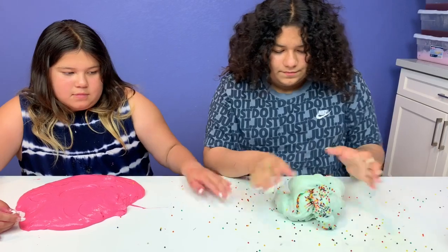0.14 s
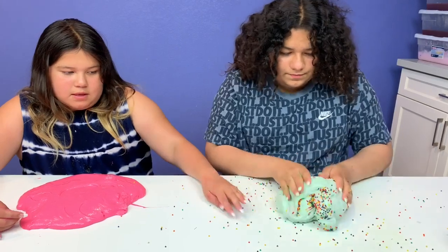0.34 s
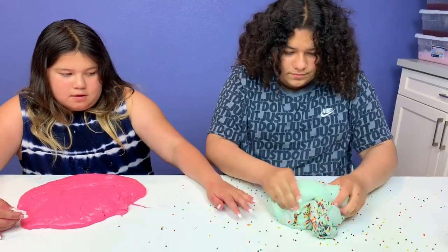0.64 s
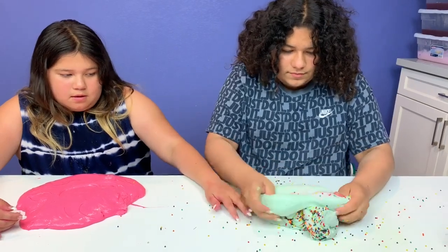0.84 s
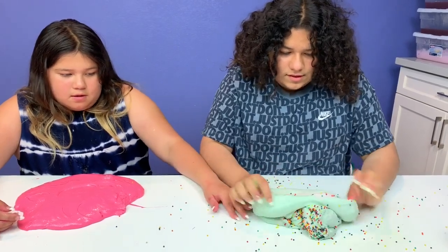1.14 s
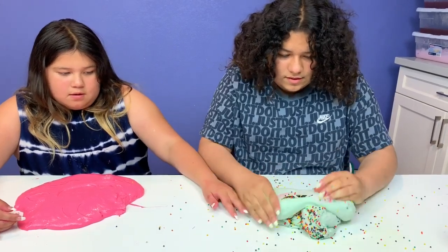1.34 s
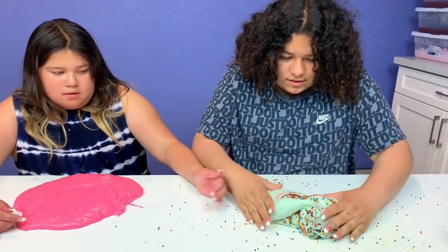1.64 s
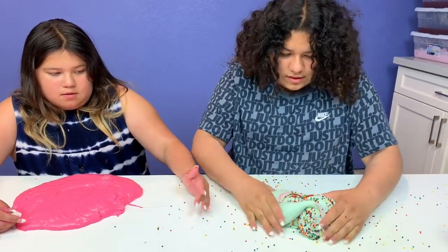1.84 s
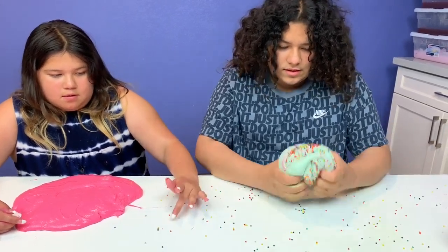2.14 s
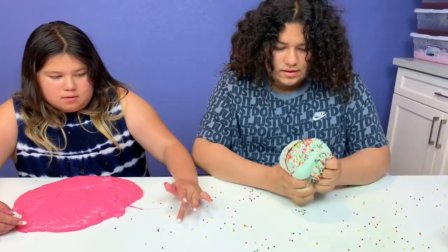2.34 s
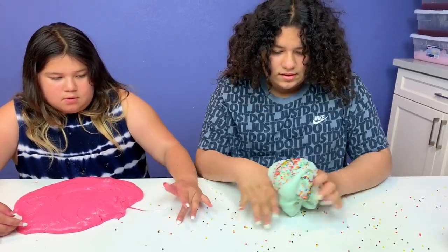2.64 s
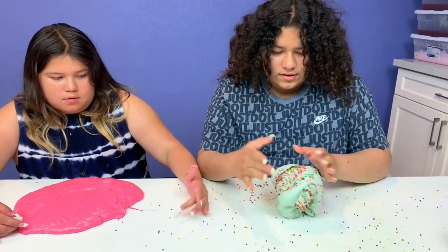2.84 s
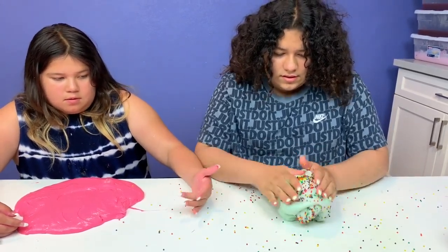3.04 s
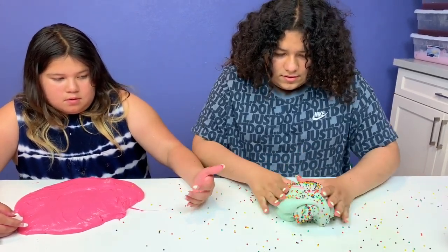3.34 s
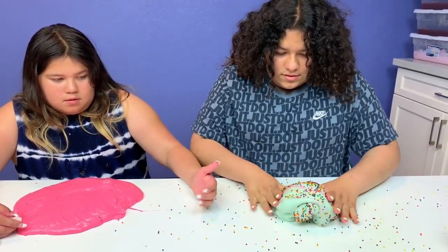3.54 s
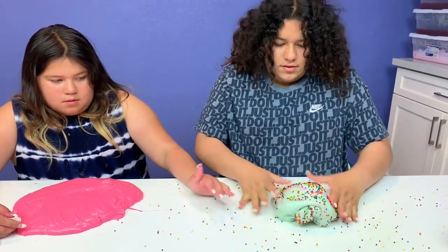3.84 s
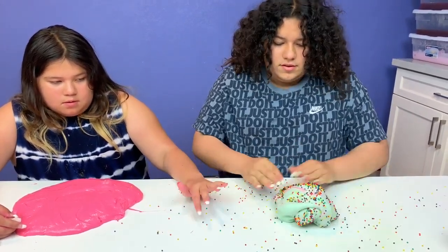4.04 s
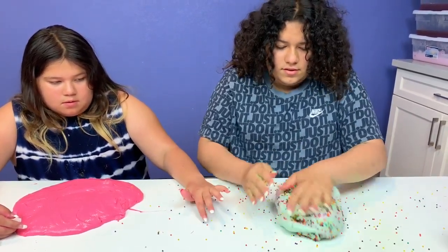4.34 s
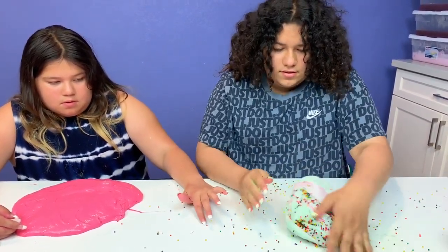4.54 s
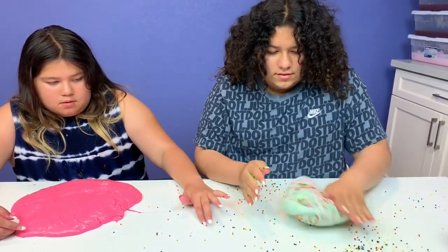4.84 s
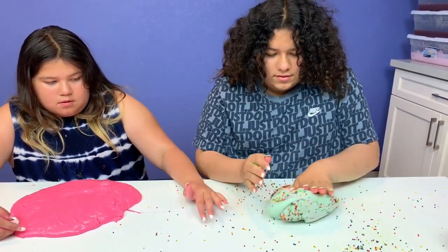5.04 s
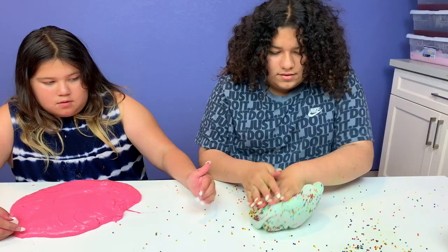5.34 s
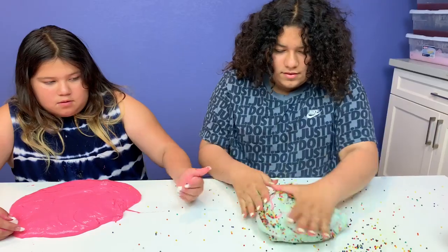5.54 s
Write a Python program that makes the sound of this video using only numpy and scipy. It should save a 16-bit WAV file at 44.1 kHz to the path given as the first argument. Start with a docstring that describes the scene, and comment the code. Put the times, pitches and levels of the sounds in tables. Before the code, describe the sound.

Close stereo sound of crunchy slime being worked on a tabletop in a small room with very short reflections. One heavy slap opens it, dying quickly into irregular tiny snaps and wet peeling. Pops thicken near three seconds, thin out almost to quiet before four, then gather again into a crisp rip and soft rolling presses. A low house rumble stays barely audible underneath.

```python
"""Kneading bead-filled slime

Hands squeeze, fold and roll a lump of bead-filled slime on a table in a small room, a metre from a two-port
microphone. Air pockets and sticky threads pop in the treble as filtered noise puffs, singly and in dense crackle.
The lump drops, drags and presses on the table, whose dull ring is a bank of decaying modes; a trapped hollow
hums as narrow noise. Diffuse noise tails make the room, and a faint low rumble of the house lies under it all."""
import sys
import numpy as np
from scipy import signal
from scipy.fft import rfft, irfft, next_fast_len
from scipy.io import wavfile
from scipy.ndimage import uniform_filter1d

SR = 44100
rng = np.random.default_rng(int(sys.argv[2]) if len(sys.argv) > 2 else 0)


def invert_db(level):
    """Linear amplitude ratio for a level in decibels (20 dB per decade), elementwise."""
    return 10 ** (np.asarray(level, dtype=float) / 20)


def store_wav(level_fs):
    """Save 16-bit WAV to argv[1]."""
    pcm = np.round(np.clip(np.atleast_2d(level_fs), -1, 1) * 32767)
    wavfile.write(sys.argv[1], SR, pcm.T.astype(np.int16))


N = 250929
T = np.arange(N) / SR  # time in seconds

RISE_S = 0.002  # time from the start of a puff to its peak
WIDE_DB = -5.5  # part of the wet sound that reaches the two ports unlike, from hands spread apart
OPPOSITE = np.array([[1], [-1]])  # left and right with opposite signs


def level(x, db):
    """Scale to an rms level in dB."""
    return np.asarray(x) * invert_db(db) / np.sqrt(np.mean(np.square(x)))


def colour(x, points):
    """Shape the spectrum by (Hz, dB) points, joined on a logarithmic frequency axis."""
    size = next_fast_len(N)
    hz, db = np.transpose(points)
    bins_hz = np.arange(size // 2 + 1) * SR / size
    gain = invert_db(np.interp(np.log(bins_hz + 1), np.log(hz), db))
    return irfft(rfft(x, size) * gain, size)[..., :N]


def band(x, lo_hz, hi_hz):
    """Causal band-pass."""
    sos = signal.butter(2, [lo_hz, min(hi_hz, 0.48 * SR)], "bandpass", fs=SR, output="sos")
    return signal.sosfilt(sos, x)


def highpass(x, order, hz):
    """Causal high-pass."""
    return signal.sosfilt(signal.butter(order, hz, "highpass", fs=SR, output="sos"), x)


def lowpass(x, order, hz):
    """Causal low-pass."""
    return signal.sosfilt(signal.butter(order, hz, fs=SR, output="sos"), x)


def curves(rows):
    """Columns of a (seconds, value, ..) table as straight lines in time."""
    s, *columns = np.transpose(rows)
    return [np.interp(T, s, column) for column in columns]


def add(out, sound, s):
    """Mix a short sound in at time s."""
    start = max(int(s * SR), 0)
    out[start:start + len(sound)] += sound[:N - start]


def scatter(rate, spread_db):
    """Impulses at random moments, rate per second; most are small, a few large."""
    sizes = invert_db(spread_db * np.minimum(rng.exponential(size=N), 4.5))
    return (rng.random(N) < rate / SR) * sizes


def bursts(starts, decay_s):
    """Every impulse sets off a puff of noise that falls to 1/e in decay_s."""
    envelope = signal.lfilter([1], [1, -np.exp(-1 / (decay_s * SR))], starts)
    return envelope * rng.standard_normal(N)


def puff(rise_s, decay_s, lo_hz, hi_hz, click=0):
    """One band-limited puff of noise with peak 1, its crest RISE_S after the start, where a click may sharpen it."""
    t = np.arange(SR // 6) / SR - RISE_S
    shape = np.exp(-np.abs(t) / np.where(t < 0, rise_s, decay_s))
    tick = click * signal.unit_impulse(len(t), int(RISE_S * SR))
    y = band(rng.standard_normal(len(t)) * shape + tick, lo_hz, hi_hz)
    return y / np.abs(y).max()


# Low spectrum of the house, heard everywhere in the room. Each row: frequency in Hz, relative level in dB per Hz.
RUMBLE_SPECTRUM = [(12, -61), (20, 11.5), (90, 1), (187, -11.5), (267, -47), (600, -30.5), (780, -77),
                   (1320, -120)]


def rumble():
    """Steady low background of the house, noise that is nearly alike at both ports."""
    mid, side = rng.standard_normal((2, N))
    return level(colour(mid + invert_db(-13.5) * side * OPPOSITE, RUMBLE_SPECTRUM), -59.5)


def room(x, count=8):
    """Diffuse, dull reflections, alike at both ports only in the bass; count tails take turns every 30 ms."""
    t60_s = 0.1
    t = np.arange(int(0.3 * SR)) / SR
    turn, out = np.floor(T / 0.03) % count, 0
    for k in range(count):
        # each tail is silent for its first 3 ms
        mid, side = rng.standard_normal((2, len(t))) * invert_db(-60 * t / t60_s) * (t > 0.003)
        side = highpass(side, 1, 450)
        tail = level([mid + side, mid - side], 0) / np.sqrt(len(t))
        here = x * uniform_filter1d(1.0 * (turn == k), size=400)
        out = out + signal.fftconvolve(here[None], tail)[:, :N]
    return lowpass(out, 1, 6500)


# Modes of the table top under the lump. Each row: frequency in Hz, relative level in dB, 60 dB decay in seconds.
TABLE_MODES = [(84, -0.5, 0.28), (121.7, -4, 0.31), (210, 4, 0.036), (260, -5, 0.029), (327, -10.5, 0.096),
               (442.6, 9.5, 0.02), (590, -7, 0.055), (952, 8, 0.031), (2320, -12, 0.027)]


def ring(force, centre_hz, octaves):
    """The table's modes, driven by a force that reaches mostly those near centre_hz."""
    out = 0
    for hz, db, t60 in TABLE_MODES:
        pole = np.exp(2j * np.pi * hz / SR - np.log(1000) / (t60 * SR))
        reach_db = -6 * (np.log2(hz / centre_hz) / octaves) ** 2
        out = out + invert_db(db + reach_db) * signal.lfilter([1], [1, -pole], force).imag
    return out


# The lump at work on the table top, joined by straight lines.
# Each row: time in seconds, level of the dragging in dB, level of the shifting weight in dB.
PRESS = [(0.0, -28, -45), (0.06, -35, -32), (0.13, -44.5, -45), (.27, -57.5, -49), (0.38, -51, -70),
         (.54, -60, -54), (0.82, -65, -65), (0.95, -59, -51.5), (1.14, -54, -62), (1.28, -79, -65),
         (1.55, -60, -57), (1.85, -68.5, -63), (2.09, -49, -54), (2.22, -60, -59), (2.5, -70.5, -70),
         (2.77, -66, -61.5), (2.92, -62.5, -66.5), (3.3, -72, -57), (3.46, -66.5, -74), (3.58, -73.5, -56),
         (3.73, -75, -77), (3.86, -89, -76), (3.9, -60.5, -51), (4.05, -86, -85), (4.34, -58.5, -55.5),
         (4.6, -62, -63.5), (4.94, -58, -51), (5.12, -60.5, -55), (5.4, -68, -58.5), (5.56, -54, -55.5),
         (5.69, -63, -51)]


def pressing():
    """Rubbing stirs the table's upper modes and pressing its lower ones, in jerks."""
    rub_db, press_db = curves(PRESS)
    rub = level(ring(bursts(scatter(700, 1.5), 0.004), 480, 0.8), 0)
    press = level(ring(bursts(scatter(400, 1.5), 0.004), 185, 0.6), 0)
    return rub * invert_db(rub_db) + press * invert_db(press_db)


# Lump or hand lands on the table. Each row: start in seconds, peak in dB ahead of the table's bass loss,
# pitch in Hz that the spot and softness of the landing favour.
THUDS = [(0.0, -6.5, 352), (0.004, -4.5, 388), (0.017, -25, 354), (0.054, -20.5, 189), (0.158, -39, 260),
         (0.197, -38, 124), (0.361, -37.5, 202), (2.059, -36, 230), (2.069, -33.5, 230), (2.077, -35, 302),
         (2.108, -33.5, 227), (2.204, -33.5, 740), (2.213, -31, 142), (2.746, -36.5, 126),
         (3.182, -41, 176), (3.314, -43.5, 134), (3.886, -44, 200), (3.9, -45, 200), (3.915, -40, 210),
         (4.822, -44, 210), (4.909, -42, 216), (4.985, -41, 230), (5.303, -36, 206), (5.554, -31.5, 154.3)]


def landings():
    """Each landing pushes the table smoothly and sets its modes ringing."""
    out = np.zeros(N)
    push_s = 0.0019  # how long the soft lump takes to load the table
    push = np.pad(np.hanning(int(push_s * SR)), (0, SR // 4))
    for s, peak_db, centre_hz in THUDS:
        # a harder blow reaches more of the modes
        blow = ring(push, centre_hz, 0.44 + 0.1 * invert_db(peak_db / 2))
        add(out, invert_db(peak_db) * blow / np.abs(blow).max(), s)
    return out


def table():
    """Landings and pressing together; a panel radiates its slowest motion poorly."""
    return highpass(pressing() + landings(), 3, 90)


# The rolling lump traps a hollow of air against the table. Each row: time in seconds, pitch in Hz, level in dB.
HOLLOW = [(4.84, 630, -71), (4.875, 625, -56), (4.92, 568, -63), (4.97, 588, -61.5), (5.04, 617, -60),
          (5.1, 637, -58), (5.15, 566, -66), (5.2, 522, -87)]


def hollow():
    """The trapped air hums as it changes shape: narrow noise that follows its pitch."""
    width_hz = 98
    hz, db = curves(HOLLOW)
    re, im = lowpass(rng.standard_normal((2, N)), 2, width_hz / 2)
    carrier = np.exp(2j * np.pi * np.cumsum(hz) / SR)
    hum = level(((re + 1j * im) * carrier).real, 0)
    return hum * invert_db(db) * (T > HOLLOW[0][0])


# Tone of the wet releases between the fingers. Each row: frequency in Hz, relative level in dB per Hz.
SQUELCH_SPECTRUM = [(420, -12), (750, -2.5), (1100, -4.5), (1900, 0), (3500, -6), (4550, -14.5),
                    (7700, -55.5)]


def squelch(level_db):
    """Wet, slower releases of air between the fingers."""
    return level(colour(bursts(scatter(900, 4.6), 0.0052), SQUELCH_SPECTRUM), 0) * invert_db(level_db)


def peeling(level_db):
    """Sticky threads let go of the skin with duller ticks."""
    return level(band(bursts(scatter(900, 2.3), 0.0034), 3270, 9900), 0) * invert_db(level_db)


# Tone of the tiny pockets in the lump. Each row: frequency in Hz, relative level in dB per Hz.
SNAP_SPECTRUM = [(3500, -19), (5000, -8.5), (6300, -0.5), (7400, -4.5), (9300, -1), (11400, -1),
                 (13400, -2), (15200, -5.5), (16400, -35)]


def crackle(level_db):
    """Thousands of tiny pockets and beads a second, a few larger ones among them."""
    fine = level(bursts(scatter(1900, 2.6), 0.00036), 0)
    coarse = level(bursts(scatter(400, 2.8), 0.0006), 1)
    return level(colour(fine + coarse, SNAP_SPECTRUM), 0) * invert_db(level_db)


# A fold in the lump tears open. Each row: start in seconds, added crackle in dB at the start,
# time in seconds in which it fades to 1/e.
TEARS = [(0.226, -38.5, 0.032), (.445, -32, 0.017), (0.767, -34.5, 0.01), (1.88, -47, 0.11),
         (2.915, -51, 0.011), (3.001, -41, 0.019), (3.932, -43.5, 0.026), (4.009, -32, 0.0033),
         (4.042, -34, 0.025), (4.174, -38, 0.0037), (4.244, -38, 0.02), (4.573, -41, 0.021)]


def tearing(crackle_db):
    """The crackle level in dB, with the quick runs of pockets that burst in a torn fold on top."""
    gain = invert_db(crackle_db)
    for s, db, fade_s in TEARS:
        gain = gain + invert_db(db) * (T >= s) * np.exp(-np.abs(T - s) / fade_s)
    return 20 * np.log10(gain)


# The hands at work in the lump, joined by straight lines.
# Each row: time in seconds, level of the fine crackle in dB before tears, level of the wet squelch in dB.
KNEAD = [(0.0, -24.5, -31.5), (0.06, -27, -46), (0.14, -35.5, -50), (0.54, -46.5, -57), (0.63, -43, -50),
         (0.86, -48.5, -62), (1.14, -47.5, -49.5), (1.24, -43.5, -53), (1.28, -54, -56.5),
         (1.6, -46, -55.5), (1.84, -49, -59.5), (2.1, -48, -49), (2.31, -51.5, -63), (2.36, -52.5, -58),
         (2.68, -55, -58), (2.94, -40, -53.5), (3.05, -45.5, -55), (3.33, -52.5, -59), (3.48, -57, -65),
         (3.7, -58, -64), (3.86, -60, -72.5), (3.9, -55.5, -56), (4.1, -48.5, -58), (4.54, -50.5, -58.5),
         (4.57, -38, -46.5), (4.74, -37, -53.5), (5.12, -52, -59), (5.38, -61.5, -60.5),
         (5.41, -41.5, -55.5), (5.54, -46, -61.5), (5.6, -51.5, -60)]


def kneading():
    """Crackle, peeling and squelch of the worked lump: the part in common and the part unlike at the ports."""
    crackle_db, squelch_db = curves(KNEAD)
    # peeling lies between crackle and squelch
    peel_db = 0.68 * crackle_db + 0.32 * squelch_db
    common = crackle(tearing(crackle_db)) + peeling(peel_db) + squelch(squelch_db)
    wide = invert_db(WIDE_DB) * (peeling(peel_db) + squelch(squelch_db)) * OPPOSITE
    return common, wide


# Larger pockets let their air out; the bright row at 4.575 is a fold tearing.
# Each row: time of the crest in seconds, peak in dB, pitch in Hz, decay to 1/e in seconds.
SMACKS = [(.005, -22.5, 2000, 0.0033), (0.038, -13, 6440, 0.0024), (0.058, -14, 6100, 0.0075),
          (0.589, -23, 6240, 0.0011), (0.6, -32, 3320, 0.025), (1.059, -43.5, 1070, 0.0041),
          (1.092, -36, 1830, 0.0045), (1.158, -35.5, 2650, 0.032), (1.965, -28.5, 4400, 0.04),
          (1.992, -33.5, 4430, 0.014), (2.011, -29, 4100, 0.0052), (2.34, -43, 960, 0.008),
          (2.343, -47, 605, 0.05), (2.371, -31, 6260, 0.0025), (2.601, -30.5, 3100, 0.0037),
          (2.634, -43, 1130, 0.0021), (2.673, -33, 4400, 0.002), (2.714, -45.5, 1180, 0.0087),
          (2.809, -44, 1390, 0.0066), (2.935, -22, 6000, 0.0019), (4.575, -16, 12700, 0.042)]


def smacks():
    """A wet smack or a bright tear: a click and a noise puff around its pitch."""
    out = np.zeros(N)
    for s, peak_db, hz, decay_s in SMACKS:
        smack = puff(0.00017, decay_s, hz / 1.24, hz * 1.32, click=0.67)
        add(out, invert_db(peak_db) * smack, s - RISE_S)
    return out


# Single pockets that burst under the hands.
# Each row: time of the crest in seconds, peak of the snap in dB ahead of its place left or right.
POPS = [(0.0055, -6.5), (0.036, -10), (0.109, -22), (.247, -19), (0.258, -23), (.275, -15), (0.288, -12),
        (0.343, -18), (.393, -20.5), (0.4, -15), (0.445, -33.5), (.477, -22), (0.577, -23), (0.7, -22),
        (0.9254, -23.5), (0.9426, -20.5), (1.035, -24), (1.0463, -24), (1.07, -22), (1.325, -29),
        (1.5376, -18.5), (1.555, -20), (1.592, -26.5), (1.597, -26.5), (1.6135, -17), (1.6177, -25),
        (1.6461, -20.5), (1.651, -15.5), (1.675, -17.5), (1.757, -27), (1.769, -30.5), (1.8012, -22),
        (1.8105, -27.5), (1.822, -25), (1.883, -21), (1.894, -25), (2.026, -19.5), (2.1977, -19),
        (2.233, -19), (2.2555, -26), (2.273, -24), (2.437, -15), (2.5633, -21.5), (2.7236, -20.5),
        (2.7405, -29.5), (2.7618, -19.5), (2.77, -22), (2.7855, -20.5), (2.834, -19), (2.8459, -17),
        (2.8627, -13.5), (2.8705, -11), (2.898, -26), (2.9034, -24), (2.923, -12.5), (2.937, -18),
        (2.957, -21), (2.962, -16), (2.9918, -16.5), (3.0049, -12), (3.0649, -19), (3.076, -15.5),
        (3.088, -18.5), (3.1112, -21), (3.114, -21.5), (3.141, -23), (3.1583, -29), (3.1828, -19),
        (3.198, -44.5), (3.228, -19.5), (3.2325, -14.5), (3.289, -28), (3.323, -25.5), (3.346, -27.5),
        (3.3793, -18), (3.3943, -20.5), (3.6341, -28.5), (3.6626, -34), (3.689, -25), (3.703, -31),
        (3.712, -33), (3.771, -29.5), (3.816, -38), (3.8397, -28), (3.869, -28), (3.985, -17.5),
        (4.012, -18.5), (4.0412, -21.5), (4.047, -16), (4.142, -29.5), (4.177, -21.5), (4.225, -18),
        (4.2478, -23.5), (4.251, -24), (4.259, -19), (4.274, -26), (4.343, -30.5), (4.3799, -13),
        (4.39, -20), (4.422, -15.5), (4.44, -17.5), (4.481, -21), (4.501, -14.5), (4.5173, -20),
        (4.527, -23.5), (4.544, -29.5), (4.554, -16), (4.5587, -19), (4.562, -25), (4.565, -11.5),
        (4.74, -22.5), (4.787, -20), (4.8002, -22), (4.815, -22), (4.8731, -23), (4.902, -27), (4.924, -22),
        (4.999, -22.5), (5.0255, -24.5), (5.0475, -22.5), (5.0594, -19.5), (5.152, -23.5), (5.172, -23.5),
        (5.201, -19), (5.2993, -28), (5.368, -22), (5.401, -17), (5.423, -19.5), (5.573, -21.5),
        (5.618, -25), (5.643, -21.5), (5.6714, -19), (5.6826, -21)]


def pops():
    """A bursting pocket: a sharp snap together with a lower, slightly longer puff of its film."""
    body_db, body_growth, body_spread_db = -9, 0.9, 1.5  # the film weakens less than the snap in smaller pops
    film_octaves, pan_db = 0.14, 1.2  # spread of the film's pitch, and of the place left or right
    out = np.zeros((2, N))
    for (s, peak_db), (loud, size, place) in zip(POPS, rng.standard_normal((len(POPS), 3))):
        snap = invert_db(peak_db) * puff(0.0002, 0.001, 10600, 15070, click=4.6)
        pitch = 2 ** (film_octaves * np.clip(size, -2, 2))
        body = puff(0.0002, 0.002, 5100 * pitch, 9600 * pitch, click=4)
        unlike = puff(0.0002, 0.002, 5100 * pitch, 9600 * pitch)
        body_gain = invert_db(body_db + body_growth * peak_db + body_spread_db * loud)
        for side, port in zip((1, -1), out):
            film = body_gain * (body + side * invert_db(WIDE_DB) * unlike)
            add(port, invert_db(side * pan_db * place) * (snap + film), s - RISE_S)
    return out


# The microphone's two openings. Each row: frequency in Hz, phase in radians by which the left port leads.
PORTS = [(0, 0), (950, -.2), (2070, -2.2), (3100, .2), (4500, -.7), (5340, -2.1), (6300, -1.6),
         (7300, -3.1), (8900, -5.8), (11300, -9.4), (16000, -15.4)]


def ports(x):
    """The housing shifts the phase between the two openings, half of it at each."""
    size = next_fast_len(N)
    hz, lead = np.transpose(PORTS)
    turn = np.exp(0.5j * np.interp(np.arange(size // 2 + 1) * SR / size, hz, lead))
    return irfft(rfft(x, size) * np.array([turn, turn.conj()]), size)[:, :N]


def scene():
    """Slime and table with the room, over the background."""
    common, wide = kneading()
    slime = common + hollow()
    bursting = pops() + smacks()
    top = table()
    # pops beam forward and stir the room less; the microphone stands close to the table: drier knocks
    wet = room(slime + invert_db(-7) * bursting.mean(axis=0) + invert_db(-1.5) * top)
    direct = ports(slime + bursting + top) * invert_db(-0.2 * OPPOSITE)  # the right port is slightly louder
    return direct + wide + invert_db(-0.5) * wet + rumble()


def top_cut(x):
    """Nothing passes above the cut-off."""
    return signal.sosfilt(signal.butter(12, 16510, fs=SR, output="sos"), x)


def record(dry):
    """The finished mix, as it is stored."""
    return top_cut(dry)


dry = scene()
out = record(dry)
store_wav(out)
```